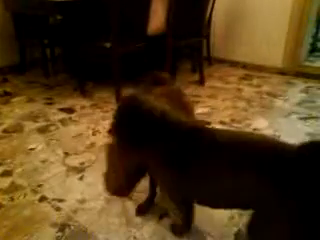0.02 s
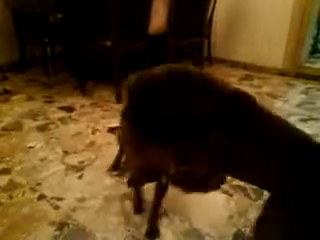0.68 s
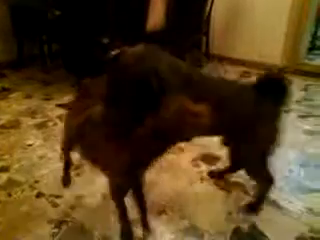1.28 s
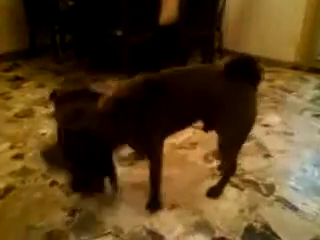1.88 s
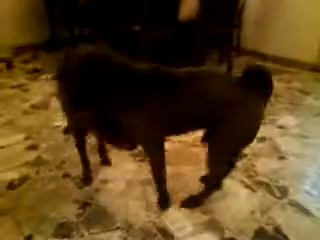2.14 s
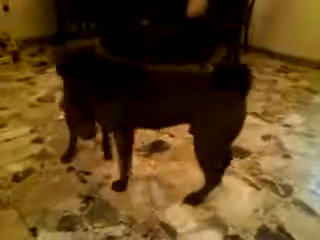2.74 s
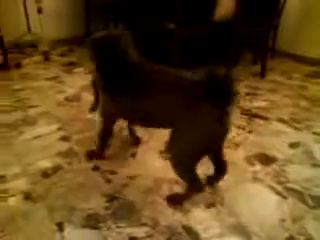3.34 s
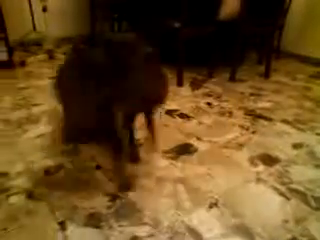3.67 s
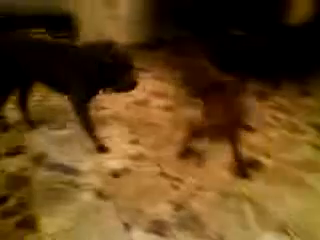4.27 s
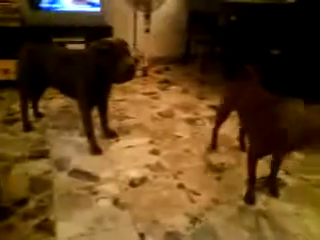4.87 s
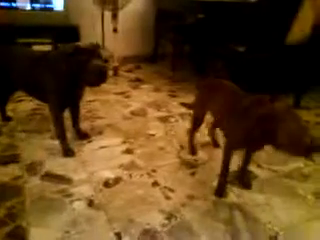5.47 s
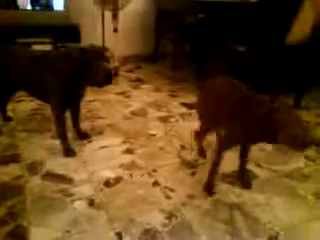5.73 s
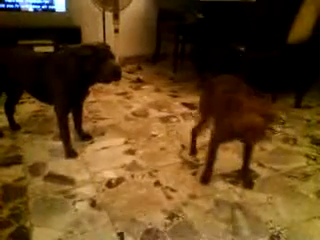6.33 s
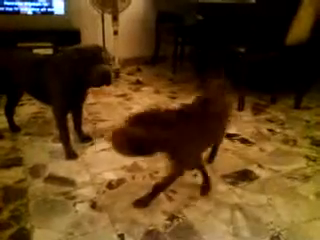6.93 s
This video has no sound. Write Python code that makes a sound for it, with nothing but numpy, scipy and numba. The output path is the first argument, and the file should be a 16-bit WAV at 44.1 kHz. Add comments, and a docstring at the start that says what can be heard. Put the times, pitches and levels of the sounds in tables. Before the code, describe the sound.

Dogs play-fight with rough growls and scuffing paws on a hard floor, ending in the quick ear slaps of a shake.

```python
"""A living room with a stone floor and hard walls; two dogs wrestle a few metres away.
They growl and snarl in bursts: uneven throat pulses and rasping air through a moving mouth,
at times breaking into short clear notes. Claws tick and paws scuff on the stone. Then one dog
shakes its head and coat: ears and lips slap, fur swishes, paws thump. The walls echo."""
import sys
import numpy as np
from scipy import signal
from scipy.fft import rfft, irfft, next_fast_len
from scipy.io import wavfile
from scipy.ndimage import map_coordinates
from numba import njit

SR = 44100
rng = np.random.default_rng(int(sys.argv[2]) if len(sys.argv) > 2 else 0)


def store_pcm(level_fs):
    """Save levels as 16-bit WAV."""
    pcm = np.round(np.clip(level_fs, -1, 1) * 32767).astype(np.int16)
    wavfile.write(sys.argv[1], SR, np.atleast_2d(pcm).T)


N = 308255

# Table levels are relative; each source adds its own gain.
# Each row: start and length in seconds, crest as a share of length, chest, mouth and snarl levels in dB,
# rasp re snarl in dB, nominal pulse rate in Hz, air share, formants 1 to 3 at mid-growl in Hz,
# formant 2 re 1 in dB, formant 4 re 3 in dB, formant glide in octaves.
GROWLS = [(0.0, 0.24, 0.012, -35.5, -33.5, -36.5, 5.5, 107, 0.54, 718, 1050, 1550, 1, -1.5, -0.16),
          (.335, 0.17, 0.96, -48, -31.5, -36, 2, 91, 0.94, 716, 1146, 1600, -3.5, -3, 0.0097),
          (0.482, 0.076, 0.36, -41, -27, -33.5, -13, 110, 0.92, 463, 1054, 1875, 5.5, -6, -0.17),
          (0.609, .19, 0.7, -41, -32.5, -40.5, -10, 88, 0.48, 660, 1134, 1620, -6, -8, -0.026),
          (0.883, 0.097, 0.6, -46.5, -24, -36.5, 6.5, 103, 0.74, 723, 1153, 1820, 0, 0.5, 0.0097),
          (1.154, 0.089, 0.44, -52, -44.5, -45.5, -1.5, 119, 0.69, 700, 1050, 1710, -14, 1.5, 0.2),
          (1.264, 0.08, 0.64, -31.5, -24.5, -29.5, 3.5, 114, 0.61, 620, 866, 1730, -4.5, 4, -0.068),
          (1.325, 0.21, 0.36, -26, -20.5, -32, 7, 134, 0.53, 576, 978, 1644, -6.5, 2.5, -0.052),
          (1.529, 0.11, .55, -28, -26, -30, 8, 125, .6, 637, 1107, 1658, 14, 3.5, 0.081),
          (1.908, .2, 0.37, -25.5, -28, -32.5, 4, 122, 0.63, 710, 1030, 1562, -7.5, -5.5, 0.19),
          (2.491, .225, 0.71, -27.5, -29, -31.5, 0, 98, 0.53, 628, 994, 1637, -8.5, -4.5, -0.015),
          (2.721, 0.11, 0.43, -33, -29.5, -36.5, -6, 93, 0.34, 650, 1044, 1640, 5, -1, 0.21),
          (3.09, 0.13, 0.19, -51, -43, -43, -17, 90, 0.69, 757, 1100, 1546, -7, 1, 0.028),
          (3.437, 0.1, 0.55, -31, -25.5, -36, 2, 119, .45, 697, 890, 1870, -6, -11, 0.033),
          (3.512, 0.11, 0.53, -28, -21, -29, 7.5, 108, .5, 676, 923, 1826, 6, -5, 0.3),
          (3.777, .1, .5, -29.5, -30.5, -42.5, -5, 100, 0.57, 637, 906, 1880, -9, -13, -0.12),
          (4.089, 0.052, .5, -38, -39, -30, -0.5, 122, 0.33, 740, 1114, 1880, 4, -20, 0.19),
          (4.148, .115, .68, -40.5, -30.5, -33, 6.5, 119, 0.71, 694, 1080, 1840, -7.5, -4.5, -0.036),
          (4.602, 0.081, .3, -45, -35, -38.5, 7, 162, 0.89, 487, 673, 1790, 0, -25, 0.059)]
FORMANT_WIDTHS_HZ = [188, 243, 302, 303]  # per resonator stage, formants 1 to 4
# Each row: start in seconds, length in seconds, start pitch in Hz, end pitch in Hz, level in dB.
YELPS = [(.002, 0.0077, 1890, 1880, -17.5), (1.336, 0.0072, 630, 606, -16), (1.3565, 0.024, 580, 525, -15),
         (1.447, 0.021, 526, 540, -12.5), (1.47, 0.063, 521, 543, -19.5), (1.944, 0.06, 280, 257, -24),
         (2.591, 0.208, 281, 257.4, -28.5), (2.642, 0.038, 630, 625, -24.5),
         (2.768, 0.086, 1114, 1101, -33), (3.475, 0.087, 228, 231, -28), (3.506, 0.0076, 2620, 2480, -23),
         (3.518, 0.0033, 2800, 2720, -21), (4.631, 0.15, 437, 502, -42.5)]
# Each row: time in seconds, pitch in Hz, level in dB.
GRUMBLE_CURVE = [(.6, 86, -50), (.65, 82, -39.5), (.72, 79.4, -41), (.78, 78, -34), (.83, 76, -66),
                 (.89, 86.5, -40), (.93, 84.5, -83)]
# Each row: start in seconds, level in dB, ring frequency in Hz.
HEAD_SLAPS = [(5.048, -24.5, 630), (5.158, -28, 2480), (5.168, -28, 865), (5.2607, -17.5, 2550),
              (5.2645, -20, 773), (5.459, -19, 2520), (5.4637, -30, 780), (5.468, -54, 2040),
              (5.559, -26, 800), (5.641, -23.5, 2280), (5.6485, -19.5, 754), (5.737, -25, 676),
              (5.818, -27.5, 776), (5.893, -24, 650), (5.972, -18.5, 743), (6.037, -26.5, 1340),
              (6.114, -27, 1110), (6.154, -35, 2130), (6.237, -27, 2450), (6.3225, -23.5, 740),
              (6.381, -30, 2750), (6.393, -30, 1045), (6.464, -30, 1830)]
CLAW_STRIKES = [(1.0609, -29, 2050), (1.2508, -26.5, 2430), (1.8557, -31, 2280), (2.3162, -24.5, 2300),
                (3.4654, -25.5, 2190), (3.5868, -20, 2010), (3.7753, -15, 2345), (3.9797, -21, 2600),
                (4.105, -24.5, 2110), (4.8495, -37.5, 2306), (5.005, -29, 5400), (5.9523, -22, 2460),
                (6.0382, -20, 1860), (6.1545, -18, 2030), (6.4324, -21.5, 1980), (6.66, -33.5, 2200),
                (6.7858, -30.5, 2000)]
# Each row: start in seconds, level in dB.
PAW_THUMPS = [(4.078, -37.5), (5.449, -38.5), (5.625, -36), (6.658, -43), (6.755, -47)]
# Each row: start in seconds, length in seconds, level in dB.
PAW_SCUFFS = [(0, 0.062, -42), (0.272, 0.32, -44.5), (0.644, 0.18, -44.5), (1.244, 0.45, -45),
              (1.845, 0.081, -43), (1.945, 0.11, -39.5), (2.28, 0.14, -44.5), (2.48, 0.32, -41.5),
              (3.054, 0.056, -47.5), (3.33, 0.13, -51.5), (3.476, .26, -37), (3.776, 0.046, -30.5),
              (3.86, 0.064, -36), (3.96, 0.1, -45), (4.116, 0.15, -37.5), (4.268, 0.38, -40.5),
              (5.012, 0.024, -42), (5.142, 0.047, -39), (5.776, .02, -38.5), (5.895, 0.3, -41),
              (6.14, 0.19, -43), (6.435, 0.057, -36), (6.68, 0.18, -47)]
# Spectra. Each row: frequency in Hz, level in dB.
CHEST_SPECTRUM = [(30, -49.5), (55, -3.5), (75, -3.5), (95, -9.5), (118, 4.5), (150, -9), (200, -4),
                  (270, -2.5), (330, -8.5), (430, -18.5), (650, -8), (1200, -104)]
RASP_SPECTRUM = [(200, -30), (400, -2), (900, -1), (1300, -6), (2400, -2), (2850, -20), (3250, -18),
                 (3520, 1), (3900, -13), (5200, -12), (6800, -14)]  # hollow near 3 kHz, fixed ring above it
LIP_SPECTRUM = [(1500, -26), (2100, -2), (2500, -6), (3000, -13), (3700, -36)]
FUR_SPECTRUM = [(120, -29), (200, -24), (269, -8), (312, -25), (610, -4.5), (667, -0.5), (1040, -13),
                (1140, -9.5), (1560, -9.5), (2470, -11.5), (3800, -19), (6120, -23.5), (7000, -45),
                (9100, -56), (15400, -120)]
PAD_SPECTRUM = [(15, -37), (25, -7.5), (113, 3), (166, -2.5), (270, -5), (314, -11.5), (400, -8),
                (520, -10), (880, -120)]
CLAW_SPECTRUM = [(300, -23.5), (1200, 6), (2500, 8.5), (3300, 0), (5000, 6), (7000, -0.5)]
SCUFF_SPECTRUM = [(150, 2.5), (600, 1), (2000, 0.5), (4000, 0), (6800, -4.5)]
BACKGROUND_SPECTRUM = [(15, -42.5), (25, 1), (81, 2.5), (264, -1), (385, -6.5), (444, -0.5), (694, -5),
                       (922, -11.5), (2050, -7), (2790, -17), (5280, -13.5), (6520, -19.5), (7000, -46.5),
                       (9100, -60.5), (15400, -120)]
# Each row: frequency in Hz, reverberation T60 in seconds.
ROOM_DECAY = [(100, 0.43), (600, 0.48), (2000, 0.62), (7000, 0.11)]
# Each row: mode frequency in Hz, T60 in seconds, gain in dB.
ROOM_MODES = [(117, 0.64, -5), (190, 0.23, -15), (288, 0.59, -21.5), (577, 0.29, 2)]


def growls(chest_db, mouth_db, snarl_db, rasp_db, pitch_rise_oct, mouth_open_s, chest_lead_s):
    """The throat drives the chest, two mouth formants and, with bared teeth, two higher ones."""
    chest_out, mouth_out, t = np.zeros(N), np.zeros(N), np.arange(SR // 2) / SR
    for (start_s, length_s, crest, chest, mouth, snarl, rasp, pulse_hz, air,
         f1_hz, f2_hz, f3_hz, f2_db, f4_db, glide_oct) in GROWLS:
        push = effort(t, length_s, crest, air, swell_db=8)
        pitch_hz = pulse_hz * 2 ** (pitch_rise_oct * (push - .5))
        pulses, puffs = throat(pitch_hz, air, jitter=.17, scatter_db=6.0, puff_s=0.0037, leak=0.77)
        blend = lambda share: np.sqrt(1 - share) * pulses + np.sqrt(share) * puffs
        source = blend(air)
        jaw = 2 ** (glide_oct * (np.minimum(t / length_s, 1) - .5))  # all formants glide together over the growl, up or down
        formants = zip([f1_hz, f2_hz, f3_hz, f3_hz * 1.359], FORMANT_WIDTHS_HZ)
        first, second, third, fourth = [formant(source, hz * jaw, width) for hz, width in formants]
        vowel = amp(mouth_db) * antiphase(first, second, f2_db)
        edge = amp(snarl_db) * antiphase(third, fourth, f4_db)
        edge += amp(rasp_db + rasp) * coloured(source, RASP_SPECTRUM)
        bass = coloured(blend(air ** 1.45), CHEST_SPECTRUM)  # less air noise reaches the bass
        opening = np.minimum(t / mouth_open_s + 0.6, 1)
        add(chest_out, start_s - chest_lead_s, push * amp(chest_db + chest) * bass)
        add(mouth_out, start_s, push * opening * (amp(mouth) * vowel + amp(snarl) * edge))
    return chest_out, mouth_out


def effort(t, length_s, crest, air, swell_db):
    """Push behind a growl: onset softer with more air, swell to the crest, release."""
    from_crest = np.abs(np.clip(t / length_s, 0, 1) - crest) / max(crest, 1 - crest)
    gate = envelope(t, length_s, attack_s=.005 + .06 * air ** 5, release_s=0.18)
    return gate * amp(-swell_db * from_crest)


def throat(pitch_hz, air, jitter, scatter_db, puff_s, leak):
    """Slack folds slap shut at uneven times; each cycle passes a puff of air."""
    size = len(pitch_hz)
    cycles = np.cumsum(pitch_hz * np.exp(jitter * np.sqrt(air) * wobble(70, size))) / SR
    closings = np.flatnonzero(np.diff(np.floor(cycles), prepend=-1) > 0)
    pulses = np.zeros(size)
    pulses[closings] = amp(scatter_db * np.clip(rng.standard_normal(size)[:len(closings)], -1, 1))
    flow = unit(signal.lfilter([1], [1, -np.exp(-1 / (puff_s * SR))], pulses))
    puffs = (flow + leak * air) * rng.standard_normal(size)
    return unit(pulses), unit(puffs)


def formant(x, hz, width_hz):
    """Moving mouth resonance, two stages for steep skirts, at rms 1."""
    pole = np.exp((2j * hz - width_hz) * np.pi / SR)
    return unit(resonator(resonator(x, pole), pole))


@njit
def resonator(x, pole):
    """One complex pole that moves per sample."""
    out, state = np.zeros(len(x)), 0j
    for i in range(len(x)):
        state = state * pole[i] + x[i]
        out[i] = state.real
    return out


def antiphase(lower, upper, upper_db):
    """Mix two neighbouring formants with opposite sign."""
    return (lower - amp(upper_db) * upper) / np.hypot(1, amp(upper_db))


def yelps(level_db, overtone_db, attack_s):
    """The voice locks briefly to a chest or mouth resonance: a nearly pure tone."""
    out = np.zeros(N)
    for start_s, length_s, start_hz, end_hz, db in YELPS:
        progress = np.linspace(0, 1, int(length_s * SR))
        phase = 2 * np.pi * np.cumsum(start_hz + (end_hz - start_hz) * progress) / SR
        swell = np.minimum(progress * length_s / attack_s, 1) * np.sqrt(1 - progress)
        tone = np.sin(phase) + amp(overtone_db) * np.sin(2 * phase)
        add(out, start_s, amp(db + level_db) * swell * tone)
    return out


def grumble(level_db):
    """Mouth shut, the folds swing evenly: a round, low tone."""
    t = np.arange(N) / SR
    times_s, hz, db = np.transpose(GRUMBLE_CURVE)
    sounding = (t >= times_s[0]) & (t <= times_s[-1])
    phase = 2 * np.pi * np.cumsum(np.interp(t, times_s, hz)) / SR
    return sounding * amp(np.interp(t, times_s, db) + level_db) * np.sin(phase)


def slaps(level_db, hold_s, ring_at_700hz_s, crack_db, crack_t60_s, partial_db, sag):
    """Ears and lips hit the head: a crack and the sagging ring of a trapped air pocket."""
    out, t = np.zeros(N), np.arange(SR // 10) / SR
    for start_s, db, hz in HEAD_SLAPS:
        ring_s = ring_at_700hz_s * np.sqrt(700 / hz)  # small pockets die sooner
        pitch_hz = hz * (1 + sag * (np.exp(-4 * t / ring_s) - .5))
        phase = 2 * np.pi * np.cumsum(pitch_hz) / SR
        pocket = np.sin(phase) + amp(partial_db) * np.sin(phase * rng.uniform(0.71, 0.99))
        pocket *= envelope(t, hold_s, attack_s=0.00026, release_s=ring_s)
        crack = noise(len(t), FUR_SPECTRUM) * amp(crack_db - 60 * t / crack_t60_s)
        add(out, start_s, amp(db + level_db) * (pocket + crack))
    return out


def lips(level_db, lead_s, length_s, grain_db):
    """Wet lips peel off the teeth just before each slap."""
    out, t = np.zeros(N), np.arange(SR // 10) / SR
    gate = envelope(t, length_s, attack_s=0.0028, release_s=0.015)
    for slap_s, db, _ in HEAD_SLAPS:
        peel = grainy_noise(len(t), LIP_SPECTRUM, grain_db, grain_hz=500)
        add(out, slap_s - lead_s, amp(db + level_db) * peel * gate)
    return out


def shake(start_s, length_s, swish_db, swish_t60_s, coat_db, patter_db, thump_t60_s, grain_db):
    """Fur swishes at each slap and throughout the shake; paws patter and land heavily."""
    t = np.arange(N) / SR
    shaking = envelope(t - start_s, length_s, attack_s=0.025, release_s=0.77)
    swishes = sum(amp(db + swish_db) * envelope(t - s + 0.022, 0.01, 0.024, swish_t60_s)
                  for s, db, _ in HEAD_SLAPS)
    thumps = sum(amp(db) * envelope(t - s, 0.011, 0.007, thump_t60_s) for s, db in PAW_THUMPS)
    fur = grainy_noise(N, FUR_SPECTRUM, grain_db, grain_hz=400)
    fur *= np.hypot(swishes, amp(coat_db) * shaking)
    pads = noise(N, PAD_SPECTRUM) * np.hypot(thumps, amp(patter_db) * shaking)
    return fur + pads


def claws(level_db, tick_t60_s, ring_db, ring_t60_s):
    """Claws tick on the stone and ring briefly."""
    out, t = np.zeros(N), np.arange(SR // 10) / SR
    for start_s, db, hz in CLAW_STRIKES:
        tick = noise(len(t), CLAW_SPECTRUM) * amp(-60 * t / tick_t60_s)
        ring = np.sin(2 * np.pi * hz * t) * amp(ring_db - 60 * t / ring_t60_s)
        add(out, start_s, amp(db + level_db) * (tick + ring))
    return out


def scuffs(level_db, rustle_db, wrestle_s, grain_db):
    """Paws slide on the stone; coats rub until the dogs part."""
    t = np.arange(N) / SR
    rustle = amp(rustle_db) * envelope(t, wrestle_s, attack_s=0.0085, release_s=0.28)
    power = rustle ** 2
    for start_s, length_s, db in PAW_SCUFFS:
        slide = amp(db) * envelope(t[:SR], length_s, attack_s=0.013, release_s=0.34)
        add(power, start_s, slide ** 2)
    return amp(level_db) * np.sqrt(power) * grainy_noise(N, SCUFF_SPECTRUM, grain_db, grain_hz=250)


def room(x, wet_db, early_db, early_t60_s=0.087, delay_s=.003):
    """Direct sound, early echoes off floor and furniture, then the walls' tail."""
    out, hop = x.copy(), SR // 10
    for start in range(-hop, N, hop):  # fresh random echoes each hop keep the room's tone even
        hz, age_s, spectra = signal.stft(rng.standard_normal(SR // 2), SR, nperseg=256)
        late = amp(-60 * age_s / log_interp(ROOM_DECAY, hz)[:, None])
        early = amp(early_db - 60 * age_s / early_t60_s)
        impulse = signal.istft(spectra * (late + early), SR, nperseg=256)[1]
        span = np.arange(max(start, 0), min(start + 2 * hop, N))
        piece = x[span] * np.sin(np.pi * (span - start) / (2 * hop))
        echoes = signal.fftconvolve(piece, impulse / np.linalg.norm(impulse))
        add(out, span[0] / SR + delay_s, amp(wet_db) * echoes)
    return out


def standing_waves(x):
    """Low notes linger at the modes between the walls."""
    def mode(hz, mode_hz, t60_s):
        damping = 1j * hz * np.log(1000) / (np.pi * t60_s)
        return damping / (mode_hz ** 2 - hz ** 2 + damping)
    return filtered(x, lambda hz: 1 + sum(amp(db) * mode(hz, mode_hz, t60_s)
                                          for mode_hz, t60_s, db in ROOM_MODES))


def background(level_db):
    """Faint, steady room noise."""
    return amp(level_db) * noise(N, BACKGROUND_SPECTRUM)


def noise(size, spectrum):
    """Coloured noise at rms 1."""
    return coloured(rng.standard_normal(size), spectrum)


def grainy_noise(size, spectrum, grain_db, grain_hz):
    """Coloured noise with a fast-flickering level, at rms 1."""
    return coloured(rng.standard_normal(size) * amp(grain_db * wobble(grain_hz, size)), spectrum)


def wobble(rate_hz, size):
    """Smooth random curve, rate_hz knots a second."""
    knots = rng.standard_normal(int(size * rate_hz / SR) + 4)
    return map_coordinates(knots, [np.arange(size) * rate_hz / SR])


def coloured(x, spectrum):
    """x shaped by a spectrum table, at rms 1."""
    return unit(filtered(x, lambda hz: amp(log_interp(spectrum, hz))))


def filtered(x, response):
    """Apply a frequency response by FFT."""
    size = next_fast_len(len(x) + 8192)
    return irfft(rfft(x, size) * response(np.fft.rfftfreq(size, 1 / SR)), size)[:len(x)]


def log_interp(points, hz):
    """Read (Hz, value) points on a log axis."""
    points_hz, values = np.transpose(points)
    return np.interp(np.log(hz + 1), np.log(points_hz + 1), values)


def envelope(t, length_s, attack_s, release_s):
    """Rise from t = 0; after length_s, fall 60 dB per release_s."""
    return np.clip(t / attack_s, 0, 1) * amp(-60 * np.maximum(t - length_s, 0) / release_s)


def amp(db):
    """Decibels to gain."""
    return 10 ** (np.asarray(db) / 20)


def unit(x):
    """Scale to rms 1."""
    return x / np.sqrt(np.mean(x ** 2) + 1e-20)


def add(track, start_s, sound):
    """Mix a sound into a track."""
    start = max(round(start_s * SR), 0)
    track[start:start + len(sound)] += sound[:N - start]


def scene():
    """Voices, head shake and paws in the room, over its background; mono."""
    chest, mouth = growls(chest_db=-4.0, mouth_db=-6.5, snarl_db=-3.5, rasp_db=-15.5,
                          pitch_rise_oct=.18, mouth_open_s=0.017, chest_lead_s=0.00794)
    voices = room(chest, wet_db=-0.5, early_db=2.5) + room(mouth, wet_db=-1.5, early_db=-1.0)
    notes = room(yelps(level_db=2.0, overtone_db=-25.5, attack_s=0.0019), wet_db=-10, early_db=-16.5)
    voices = standing_waves(voices) + notes + grumble(level_db=1.5)
    flaps = slaps(level_db=-6.0, hold_s=0.0032, ring_at_700hz_s=0.016, crack_db=-1, crack_t60_s=0.03,
                  partial_db=-4.5, sag=0.09)
    peels = lips(level_db=-20, lead_s=0.009, length_s=0.015, grain_db=4.5)
    head = room(flaps + peels, wet_db=-7, early_db=-5)
    ticks = claws(level_db=-9, tick_t60_s=0.028, ring_db=0.5, ring_t60_s=0.022)
    rubs = scuffs(level_db=-2.5, rustle_db=-51, wrestle_s=6, grain_db=2.0)
    paws = room(ticks + rubs, wet_db=-5.5, early_db=0.5)
    body = shake(start_s=5.55, length_s=0.98, swish_db=-18.5, swish_t60_s=0.58, coat_db=-46.5,
                 patter_db=-46, thump_t60_s=0.41, grain_db=1.5)
    return (voices + head + paws + body + background(level_db=-53.0))[None]


def record(dry):
    """A small camera's band limit: a steep low-pass."""
    cutoff_hz = 7020
    return np.array([filtered(x, lambda hz: 1 / np.sqrt(1 + (hz / cutoff_hz) ** 90)) for x in dry])


dry = scene()
out = record(dry)
store_pcm(out)
```